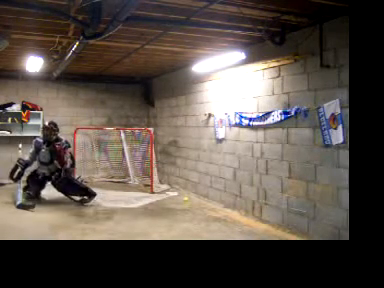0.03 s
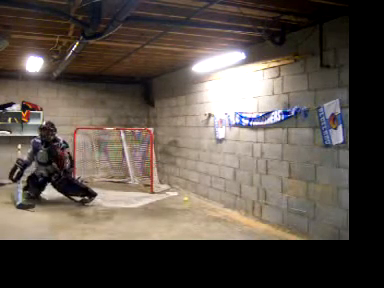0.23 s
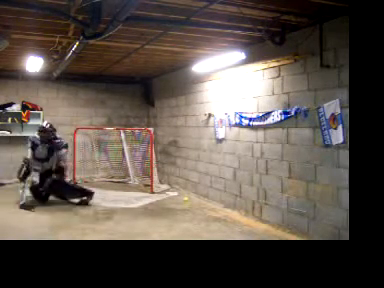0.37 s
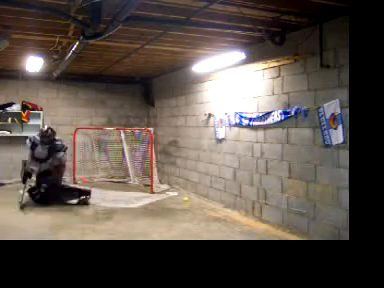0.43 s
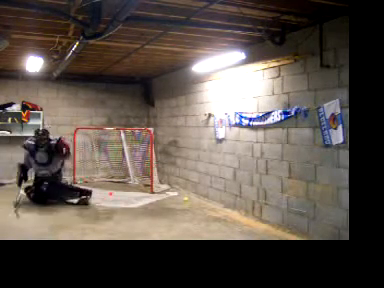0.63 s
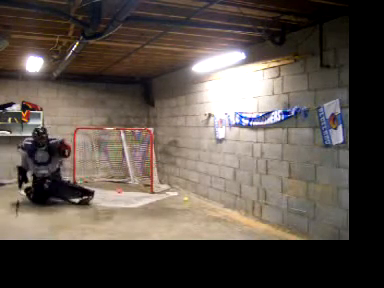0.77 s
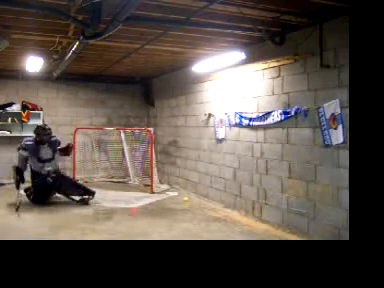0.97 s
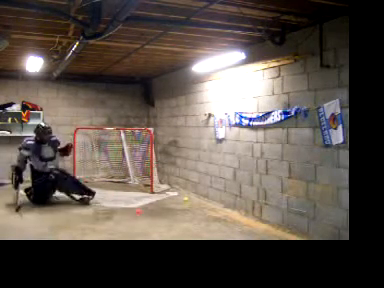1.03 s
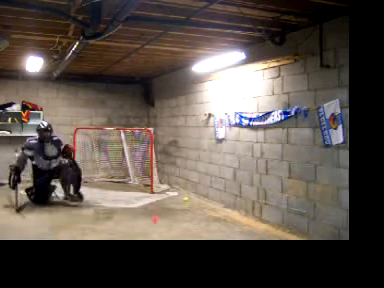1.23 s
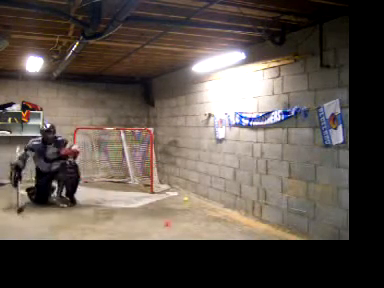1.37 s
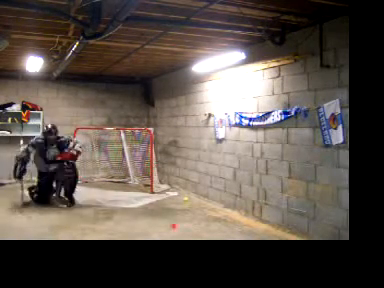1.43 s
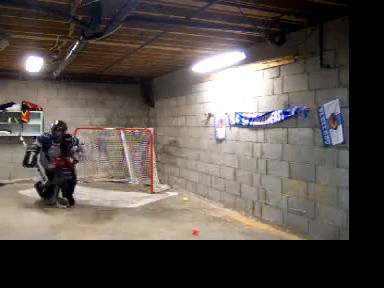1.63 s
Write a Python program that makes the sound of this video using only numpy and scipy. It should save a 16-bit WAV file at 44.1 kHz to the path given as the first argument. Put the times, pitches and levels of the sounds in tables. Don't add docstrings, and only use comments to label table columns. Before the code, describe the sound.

Hockey shot in a reverberant concrete basement. Low room hiss with faint rapid thumping opens; at 0.2 s a blade scrapes harshly, with hollow stick slaps until 0.29. At 0.47 a hard ball cracks into a goalie pad, thudding and fluttering, with bounces to 0.65. Walls ring while the hiss drops. Soft gear bumps and small ticks come around 0.8-1.0, a tick at 1.15, more shuffling at 1.5-1.6. Narrow-band, flattened camera sound.

```python
import sys
import numpy as np
from scipy import signal
from scipy.io import wavfile

SR = 44100
rng = np.random.default_rng(int(sys.argv[2]) if len(sys.argv) > 2 else 0)


def materialize(psi):
    bounded = np.clip(np.atleast_2d(psi).T, -1, 1)
    quanta = np.round(bounded * 32767).astype(np.int16)
    wavfile.write(sys.argv[1], SR, quanta)


def elevation(decibels):
    levels = np.asarray(decibels, float)
    return 10 ** (levels / 20)


N = 74970
TIME_S = np.arange(N) / SR


def rms_one(x):
    return x / np.sqrt(np.mean(x ** 2) + 1e-20)


def in_time(rows):
    return np.interp(TIME_S, *np.transpose(rows))


def at_hz(points, hz):
    table_hz, value = np.transpose(points)
    return np.interp(np.log(hz), np.log(table_hz), value)


def filtered(x, order, hz, kind):
    return signal.sosfilt(signal.butter(order, hz, kind, fs=SR, output="sos"), x)


def click(start_s, level_db):
    return elevation(level_db) * (np.arange(N) == int(start_s * SR))


def ring(clicks, hz, t60_s):
    decay = elevation(-60 / (t60_s * SR))
    w = 2 * np.pi * hz / SR
    return signal.lfilter([0, np.sin(w)], [1, -2 * decay * np.cos(w), decay ** 2], clicks + 1e-18)


def thuds(rows, t60_s, overtone, overtone_db, snap_db):
    out = np.zeros(N)
    for start_s, level_db, hz in rows:
        blow = click(start_s, level_db)
        out += ring(blow, hz, t60_s)
        out += elevation(overtone_db) * ring(blow, overtone * hz, t60_s)
        out += elevation(snap_db) * ring(blow, 2700, 0.00083)
    return out


def bands(count):
    edges_hz = 5600 * 2 ** (-np.arange(count + 1) / 3)
    settle = 4000
    white = rng.standard_normal((2, N + settle))
    for k, (high, low) in enumerate(zip(edges_hz, edges_hz[1:])):
        yield np.sqrt(low * high), filtered(white[k % 2], 2, [low, high], "band")[settle:]


# frequency in Hz, density in dB per Hz.
AIR_DB_PER_HZ = [(40, -6), (150, -5), (240, -11), (360, 0), (750, -5.5), (1600, -20), (2400, -18.5),
                 (4300, -25.5)]


def air():
    out = 0
    for hz, noise in bands(count=25):
        waver = np.interp(np.arange(N) / 2500, np.arange(40), rng.standard_normal(40))
        out = out + noise * elevation(at_hz(AIR_DB_PER_HZ, hz) + 0.43 * waver)
    return elevation(-39) * rms_one(out)


def thumps():
    first_s, per_s, length_s, level_db = 0.0285, 15.0, 0.0055, -39
    turn = (TIME_S - first_s) * per_s
    size = elevation(level_db + 2 * rng.standard_normal(40))[np.floor(turn).astype(int) + 1]
    sag = -size * (turn % 1 < length_s * per_s)
    return filtered(sag, 2, [30, 170], "band")


# time in seconds, gain in dB.
GAIN_DB = [(0, 6), (.2, 6.5), (.3, 5.5), (.47, 1), (.5, -1.5), (1.7, -2)]


def background():
    return elevation(in_time(GAIN_DB)) * (air() + thumps())


# frequency in Hz, T60 in seconds.
WALLS_T60_S = [(150, 0.92), (430, 0.69), (700, 0.74), (1400, 0.49), (2500, 0.54), (4200, 0.67)]
# frequency in Hz, level in dB.
WALLS_DB = [(150, -4), (300, -13), (500, -7), (900, -4), (1500, -2), (2500, 2.5), (4000, -8.5)]


def basement(x):
    echo = 0
    for hz, noise in bands(count=17):
        echo = echo + noise * elevation(at_hz(WALLS_DB, hz) - 60 * TIME_S / at_hz(WALLS_T60_S, hz))
    build_up = 1 - np.exp(-(TIME_S / 0.0027) ** 2)
    return signal.fftconvolve(x, echo * build_up)[:N]


# start in seconds, level in dB, pitch in Hz.
TICK_BLOWS = [
    (.835, -38.5, 3780),
    (.88, -41.5, 3890),
    (.91, -54, 2610),
    (1.15, -44.5, 3750),
    (1.545, -54, 2450),
    (1.61, -48, 2220),
]


def ticks():
    direct = thuds(TICK_BLOWS, t60_s=0.027, overtone=0.552, overtone_db=-6, snap_db=-24)
    return direct, elevation(-27) * direct


# start in seconds, level in dB, pitch in Hz.
SHUFFLE_BLOWS = [(.808, -29.5, 506), (.909, -31.5, 530), (.93, -29, 593), (.95, -28.5, 500),
                 (.975, -40, 444), (1.025, -38, 530), (1.493, -33.5, 600), (1.531, -27, 430),
                 (1.546, -24, 499), (1.565, -33, 550), (1.6, -37, 546)]


def shuffles():
    direct = thuds(SHUFFLE_BLOWS, t60_s=0.03, overtone=0.7, overtone_db=-24, snap_db=-6)
    broad = thuds(SHUFFLE_BLOWS, t60_s=0.014, overtone=1.7, overtone_db=-13.5, snap_db=-13.5)
    return direct, elevation(-17) * broad


# time in seconds, level in dB.
SCRAPE_DB = [
    (.1945, -41),
    (.1975, -28.5),
    (.2015, -10.5),
    (.209, -24.5),
    (.217, -31.5),
    (.236, -12),
    (.246, -27.5),
    (.267, -21),
    (.29, -39.5),
]
# frequency in Hz, level in dB, T60 in seconds.
BLADE_MODES = [(895, 0, 0.0071), (1357, -5, .004), (1984, 3, 0.0037), (2335, 5.5, 0.0034),
               (2810, 5, 0.0034), (3400, 7, .004), (4050, 10, 0.0087)]


def scrape():
    grits_per_s, spread_db = 4100, 1.5
    caught = rng.random(N) < grits_per_s / SR
    size = elevation(spread_db * np.minimum(rng.exponential(1, N), 4))
    grit = rms_one(caught * size * rng.choice([-1, 1], N))
    touching = (TIME_S > SCRAPE_DB[0][0]) & (TIME_S < SCRAPE_DB[-1][0])
    grit = grit * elevation(in_time(SCRAPE_DB)) * touching
    mode = rng.integers(0, len(BLADE_MODES), N)
    direct = np.zeros(N)
    for k, (hz, level_db, t60_s) in enumerate(BLADE_MODES):
        direct += elevation(level_db - 15) * ring(grit * (mode == k), hz, t60_s)
    return direct, elevation(-25) * direct


# start in seconds, level in dB, pitch in Hz.
SLAP_BLOWS = [
    (.2425, -4, 829),
    (.2468, -7, 622),
    (.256, -13, 950),
    (.2645, -11.5, 650),
    (.2682, -0.5, 440),
    (.280, -6.5, 485),
    (.284, -13.5, 864),
]


def slaps():
    direct = thuds(SLAP_BLOWS, t60_s=0.023, overtone=1.47, overtone_db=-9, snap_db=-10)
    broad = thuds(SLAP_BLOWS, t60_s=0.0077, overtone=0.84, overtone_db=-7, snap_db=-3.5)
    return direct, elevation(-22) * broad


# start in seconds, level in dB, pitch in Hz.
PAD_BLOWS = [
    (.4795, -3.5, 441),
    (.4817, -3, 450.5),
    (.4858, -4, 470),
    (.4905, -5.5, 399),
    (.4925, -5, 472),
    (.4965, -7, 565),
    (.5115, -3.5, 452),
    (.516, -12.5, 570),
    (.57, -7.5, 454),
    (.642, -16, 406),
]


def pad_hits():
    direct = thuds(PAD_BLOWS, t60_s=0.0274, overtone=1.35, overtone_db=-4.5, snap_db=-14)
    broad = thuds(PAD_BLOWS, t60_s=0.02, overtone=1.4, overtone_db=-12, snap_db=-12)
    return direct, elevation(-24.5) * broad


# frequency in Hz, level in dB, T60 in seconds.
BALL_MODES = [(2900, 0, .016), (1900, 0, .02), (2350, -8, .045), (3500, -10, .014), (1150, -10, .015)]


def crack():
    start_s, level_db = 0.4738, -6.5
    shell = np.zeros(N)
    for hz, mode_db, t60_s in BALL_MODES:
        shell += ring(click(start_s + 6.4 / hz, level_db + mode_db), hz, t60_s)
    to_walls = ring(click(start_s, -25), 2360, 0.0015)
    boom = ring(click(0.528, -29), 140, 0.14)
    return shell, to_walls, boom


def scene():
    behind = background()
    tick, tick_walls = ticks()
    gear, gear_walls = shuffles()
    drag, drag_walls = scrape()
    slap, slap_walls = slaps()
    pad, pad_walls = pad_hits()
    shell, shell_walls, boom = crack()
    wet = basement(drag_walls + slap_walls)
    wet += basement(shell_walls + pad_walls)
    wet += basement(gear_walls + tick_walls)
    play = drag + slap + shell + pad + gear + tick + wet
    mic_low_hz = 346
    return (filtered(play, 3, mic_low_hz, "high") + boom + behind)[None]


def low_pass(x):
    return signal.sosfilt(signal.butter(12, 15870, fs=SR, output="sos"), x)


def record(dry):
    knee_level, peak_level, cutoff_hz = 0.78, 0.705, 4960
    saturated = dry / (1 + (dry / knee_level) ** 4) ** 0.25
    narrow = signal.sosfilt(signal.cheby2(12, 75, cutoff_hz, fs=SR, output="sos"), saturated)
    mix = np.clip(narrow, -peak_level, peak_level)
    return low_pass(mix)


dry = scene()
out = record(dry)
materialize(out)
```